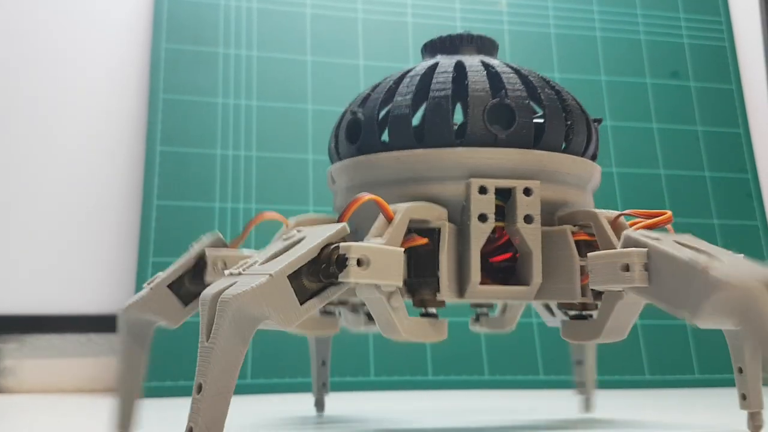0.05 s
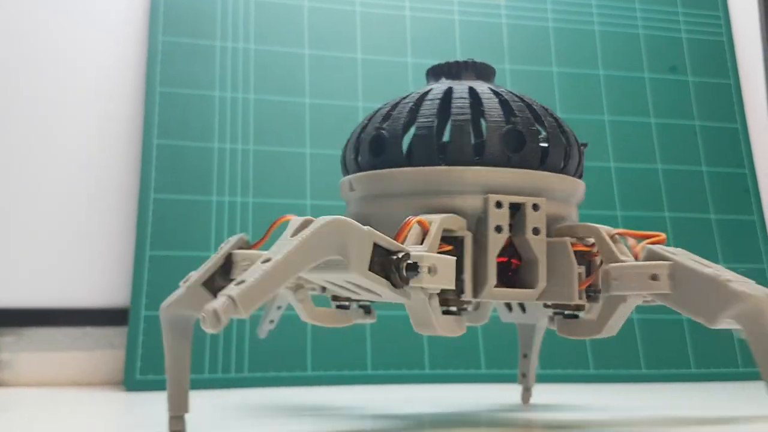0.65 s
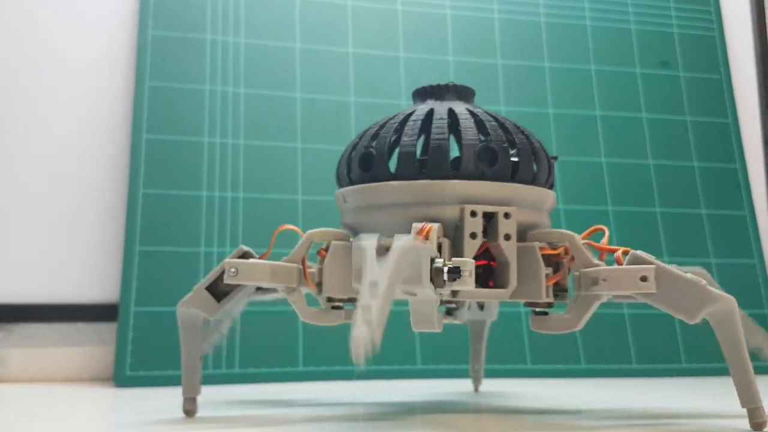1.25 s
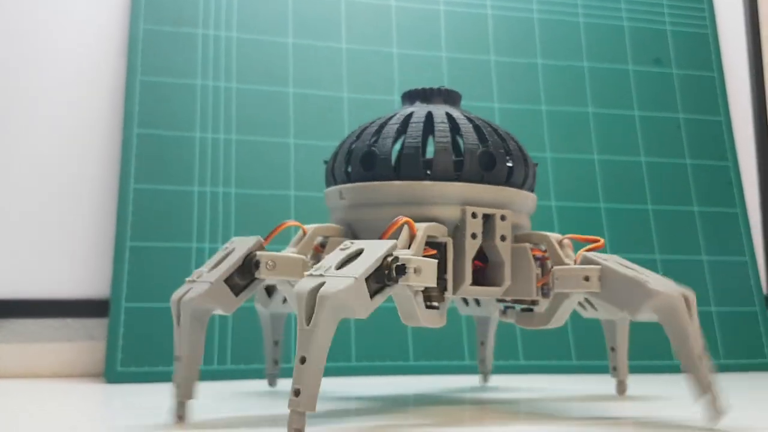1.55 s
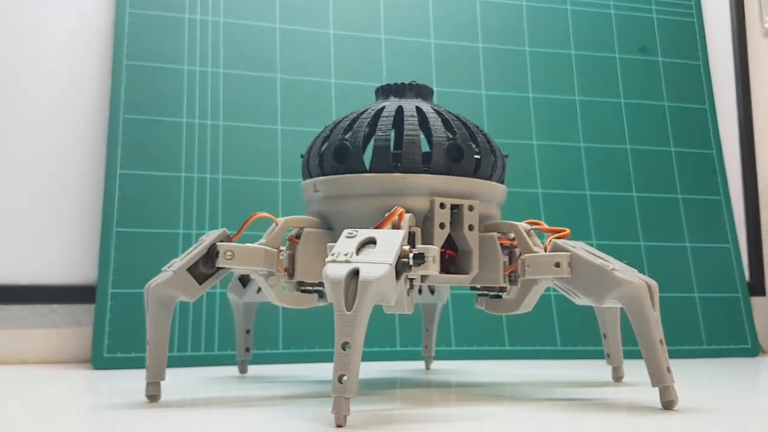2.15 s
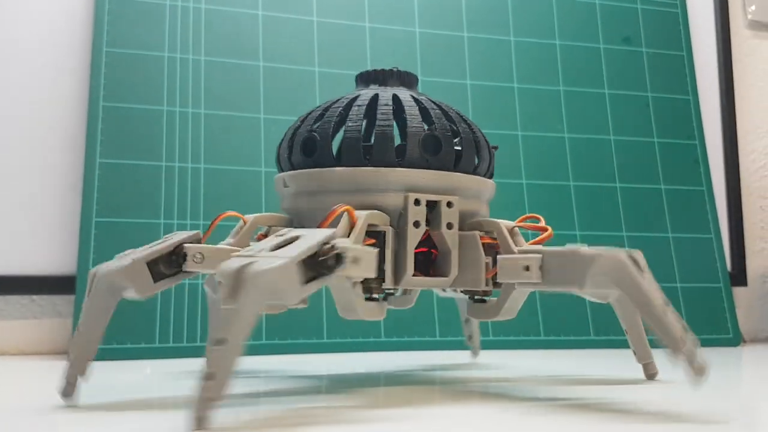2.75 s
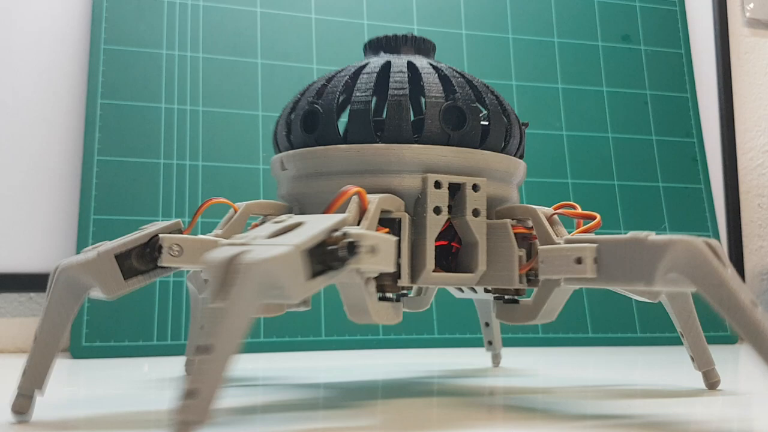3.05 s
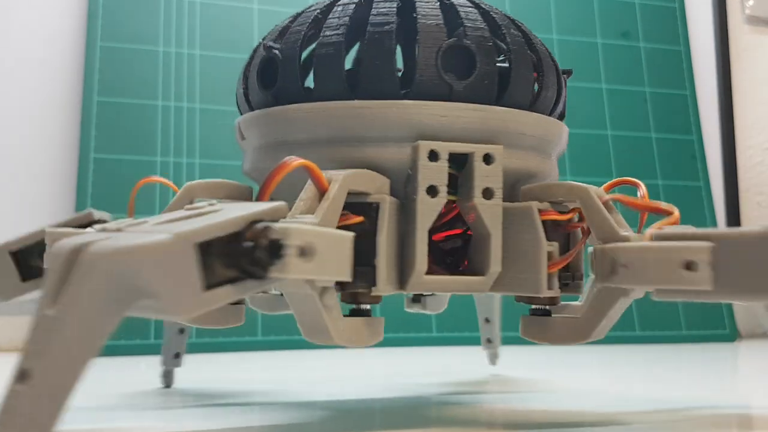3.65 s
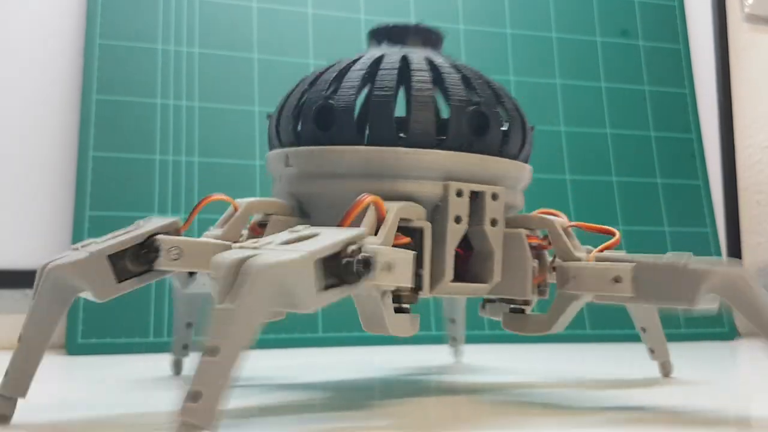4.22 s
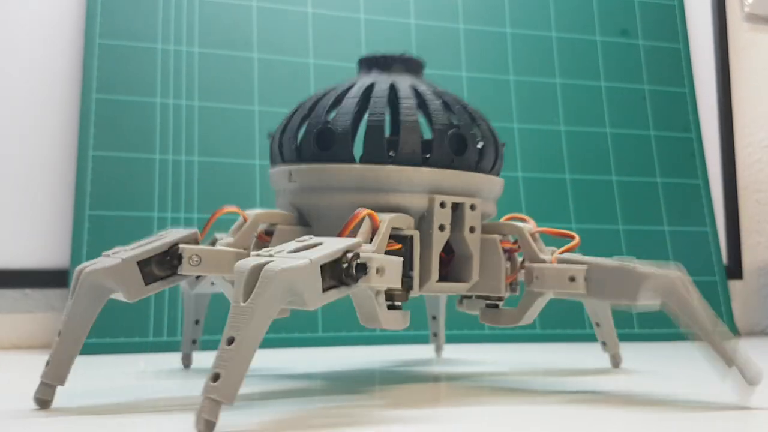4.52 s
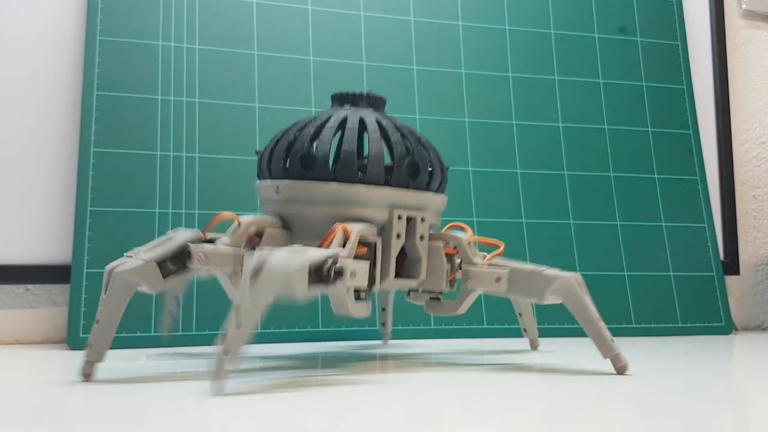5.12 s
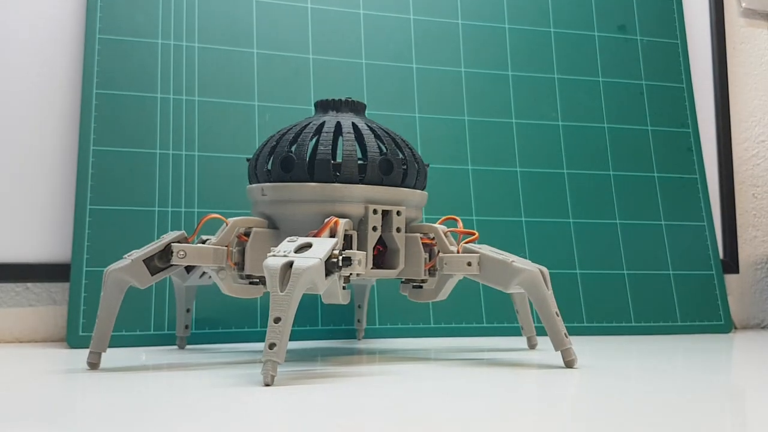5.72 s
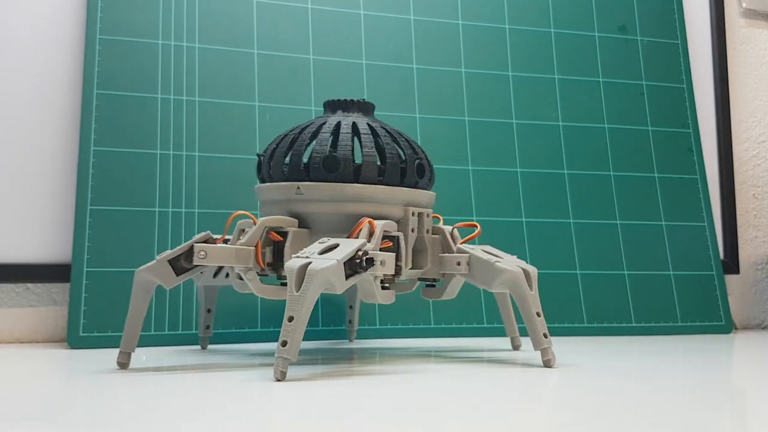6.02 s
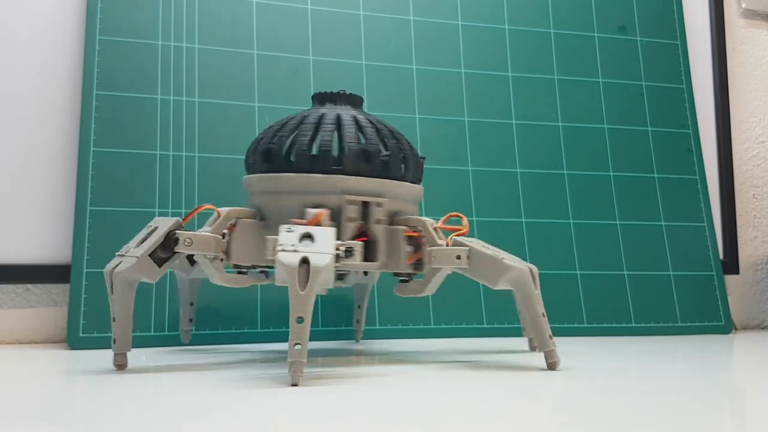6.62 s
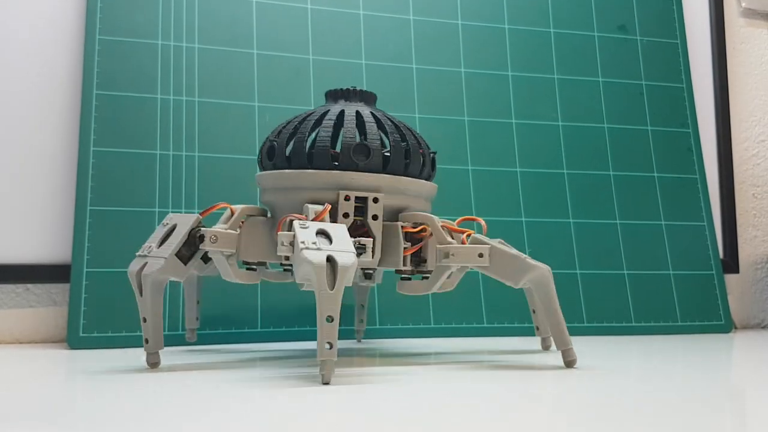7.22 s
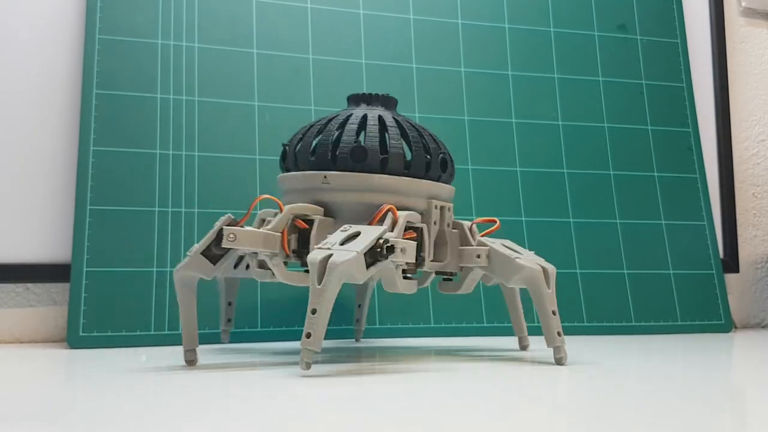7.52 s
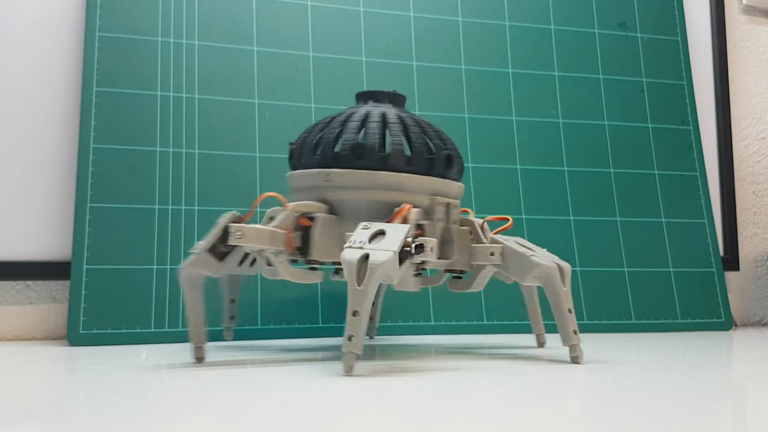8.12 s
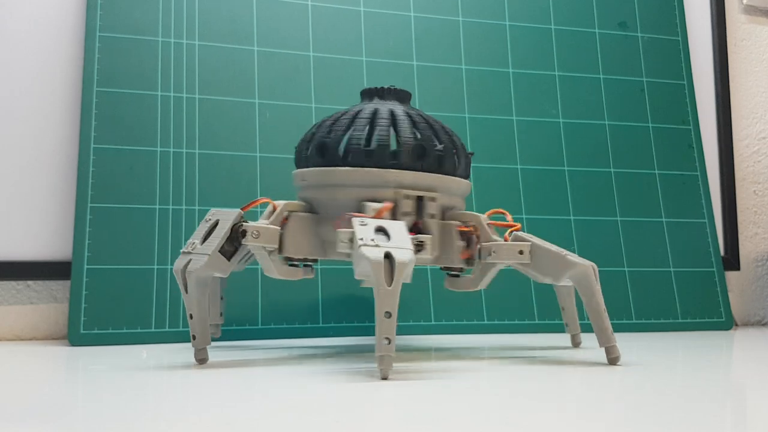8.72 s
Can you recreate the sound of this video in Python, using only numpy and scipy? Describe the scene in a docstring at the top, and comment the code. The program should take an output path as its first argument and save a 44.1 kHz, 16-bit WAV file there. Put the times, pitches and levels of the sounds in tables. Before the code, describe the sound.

Close up in a small room, bursts of geared servo whirr alternate with the clack of a little robot's plastic feet on a tabletop. The steps are measured at first, stop briefly, then return about twice as fast with short skids. Following another short rest the tapping ends, and the motors whine up and down in an even rhythm while the feet scrape and squeak. A faint electric buzz fills the gaps.

```python
"""Small four-legged robot on a table.

It walks, trots, then twists on the spot, heard close by in a small room. Hobby servos whirr in bursts
(gear clicks, friction, pinion whine, brush hiss) over a faint holding buzz; a loaded leg hums briefly.
Printed plastic feet knock, chatter and ring the table top, and stick-slip into squeaks when dragged."""
import sys
import numpy as np
from scipy import signal
from scipy.fft import rfft, irfft, next_fast_len
from scipy.io import wavfile
from scipy.ndimage import uniform_filter1d

SR = 44100
rng = np.random.default_rng(int(sys.argv[2]) if len(sys.argv) > 2 else 0)


def digitize_waveform(pressure):
    """Quantize a signal to 16-bit integers and store it at the path in sys.argv[1].

    Rows of a 2-D input are taken as channels; values are limited to [-1, 1].
    """
    field = np.atleast_2d(pressure).T
    bounded = np.clip(field, -1, 1)
    quanta = np.round(bounded * 32767).astype(np.int16)
    wavfile.write(sys.argv[1], SR, quanta)


N = 390726
TIME_S = np.arange(N) / SR

# walk, trot, twist: start_s, end_s, carry_effort_db, hiss_db, growl_db, scrape_db
GAITS = [(-0.1, 1.937, -37, -0.8, -0.5, -20.5), (2.411, 5.405, -34, -2, -0.6, -18),
         (5.921, 8.86, -42.5, -3.5, -2, -15)]
# single leg swings: start_s, effort_db, hold_s, fall_db_per_s
LEG_SWINGS = [(-0.1, -18.5, 0.056, 136), (0.253, -20.5, .11, 80), (0.641, -19, 0.087, 134),
              (1.018, -20, 0.06, 79), (1.389, -19.5, 0.077, 126), (1.758, -20, 0.023, 105),
              (2.408, -24, 0.057, 163), (2.578, -21.5, 0.078, 118), (5.365, -28, 0.014, 228),
              (5.923, -22, .15, 214)]
# diagonal leg pairs pushing in turn: start_s, effort_db, hold_s
TROT_PUSHES = [(2.729, -25.5, 0.12), (2.88, -22.5, 0.067), (3.031, -27, 0.12), (3.213, -22, 0.029),
               (3.338, -26.5, 0.13), (3.482, -23, 0.05), (3.64, -24, 0.11), (3.83, -22.5, 0.07),
               (3.978, -24.5, 0.047), (4.105, -23.1, 0.13), (4.275, -25.9, 0.1), (4.438, -22, 0.07),
               (4.601, -25.5, 0.12), (4.749, -23.0, 0.094), (4.915, -25.5, 0.11), (5.055, -23, 0.091),
               (5.216, -20, 0.031)]
# body twists, all legs together: start_s, effort_db, hold_s
TWISTS = [(6.279, -22, 0.25), (6.629, -21.5, 0.22), (7.004, -21.5, 0.25), (7.357, -21, 0.2),
          (7.714, -21, 0.25), (8.072, -21, 0.21), (8.423, -20.5, 0.24), (8.773, -21.5, 0.2)]
# feet landing in pairs: start_s, first_foot_db, lag_s, second_foot_db, thud_db
LANDINGS = [(0.107, -11, 0.054, -9, 10.5), (0.476, -8.5, 0.015, -8.5, 3.5),
            (0.871, -12.5, 0.053, -10.5, 6.5), (1.218, -11, 0.017, -7.5, -4),
            (1.502, -35.5, 0.054, -36, 21), (1.617, -11, .053, -10.5, 7.5), (1.888, -11.5, .017, -7, -3),
            (2.306, -41, .02, -57, 26), (2.727, -6.5, .029, -7, 1), (2.867, -8.5, .019, -7, -5),
            (2.938, -16, 0.0084, -30, -17), (3.024, -7.5, .017, -9, -13), (3.155, -15, .039, -10, -12),
            (3.341, -11, 0.018, -7, -5), (3.474, -12.5, 0.031, -8, -5.5), (3.661, -10, 0.016, -10, 6),
            (3.79, -12, 0.015, -13, -9), (3.973, -9.5, 0.021, -7.5, 2), (4.125, -8, .012, -14.5, -3),
            (4.286, -6.5, .027, -7, 1), (4.427, -13, 0.0086, -5, 1), (4.597, -6, 0.019, -6.5, -1),
            (4.747, -7.5, 0.013, -22, -1), (4.917, -4.5, 0.02, -6.5, -3), (5.057, -5, 0.012, -12.5, -1.5),
            (5.215, -9.5, .029, -5, -2.5), (5.346, -16.5, 0.015, -9.5, -3), (5.424, -24, .01, -47, -11),
            (8.325, -46, 0.034, -46, 33)]
# table and leg resonances: pitch_hz, level_db, t60_s
TABLE_MODES = [(135.5, -18.5, 0.18), (317.7, -17, 0.11), (566, -15.5, 0.076), (856, -14.5, 0.13),
               (1153, -10.5, 0.081), (1250, -4, 0.057), (1326, -6.5, 0.064), (2013, -0.5, 0.033),
               (2205, -2.5, 0.02), (2400, -23, 0.12), (2620, -10.5, 0.04)]
# skidding feet: start_s, end_s, first_hz, last_hz, level_db, octave_relative_db
SKIDS = [(.49, 0.531, 1308, 1238, -24, -14), (1.236, 1.29, 1410, 1170, -25, -11),
         (1.909, 1.956, 1302, 1240, -23.5, -3), (2.658, 2.863, 1244, 1460, -27.5, -23),
         (2.947, 2.973, 1734, 1670, -23.5, -25), (2.976, 3.014, 1395, 1334, -19.5, 9.5),
         (3.026, 3.095, 1355, 1378, -23.5, -20), (5.999, 6.077, 1267, 1242, -26.5, -19.5),
         (6.796, 6.88, 1085, 1130, -24, 3.5), (6.885, 6.935, 1200, 1215, -16.5, -6)]
# two-note drags, two feet squeaking in turn, every other twist: start_s, high_note_db, low_note_db
DRAGS = [(6.304, -20, -22), (7.031, -30.5, -22), (7.747, -26, -21), (8.463, -22, -21)]
# source spectra: frequency_hz, gain_db
ROOM_SPECTRUM = [(25, -29), (40, -25), (62, -3), (85, -5), (115, -2), (150, -2.5), (190, -14.5),
                 (320, -13.5), (500, -18), (1000, -10)]
GEAR_SPECTRUM = [(300, -27), (600, -64), (900, -5), (1150, -19), (1450, 0.5), (1900, -3), (2700, 5),
                 (3400, 2), (3900, -1), (5200, 1.5), (5800, 1), (6600, 5.5), (8000, -1.5), (9500, -23)]
BRUSH_SPECTRUM = [(7000, -23), (8500, -3), (9500, -0.5), (10900, 0.5), (12500, -5), (14000, -10.5),
                  (15800, -16.5)]
SCRAPE_SPECTRUM = [(60, -18), (150, -18.5), (330, -0.5), (450, -1.5), (750, -4.5), (950, 1.5), (1300, 13.5),
                   (2200, -28), (5000, -39)]
KNOCK_SPECTRUM = [(60, -22.5), (130, -12), (250, 0), (600, 6), (1200, 8.5), (1900, 10), (2500, 7.5),
                  (3100, -0.5), (3800, -8.5), (6000, -42), (15000, -16)]
# left-right likeness: frequency_hz, correlation
MIC_CORRELATION = [(100, 0.86), (600, 0.6), (1300, 0.21), (3000, 0.49), (6000, -0.5), (15000, 0)]
# microphone port colour: frequency_hz, left_minus_right_db
MIC_BALANCE = [(60, 0), (130, 1.5), (250, 0.5), (500, 3.5), (1100, 1.5), (2300, -2), (3300, -1.5),
               (5000, 1.5), (6300, 5.5), (8500, -5.5), (14000, -6.5)]

SPIN_UP_S, SETTLE_DB_PER_S = 0.02, 170


def from_db(db):
    """Decibels to gain."""
    return 10 ** (np.asarray(db) / 20)


def unit_rms(x):
    """Scale the channel mean to rms 1."""
    return x / np.sqrt(np.mean(np.atleast_2d(x).mean(axis=0) ** 2) + 1e-20)


def at_hz(points, hz):
    """Interpolate on a log-frequency axis."""
    knots_hz, values = np.transpose(points)
    return np.interp(np.log(hz + 1), np.log(knots_hz), values)


def drift(rate_hz):
    """Random wander, rms 1."""
    knots = rng.standard_normal(int(TIME_S[-1] * rate_hz) + 2)
    return unit_rms(np.interp(TIME_S * rate_hz, np.arange(len(knots)), knots))


def convolve(x, response):
    """Apply a mono or stereo impulse response."""
    return signal.oaconvolve(np.atleast_2d(x), np.atleast_2d(response), axes=1)[:, :N]


def butterworth(x, order, cutoff_hz, kind="low"):
    """Low-pass or high-pass filter."""
    return signal.sosfilt(signal.butter(order, cutoff_hz, kind, fs=SR, output="sos"), x)


def colour(x, spectrum, size=4096):
    """Minimum-phase filter with the given spectrum."""
    gain = from_db(at_hz(spectrum, np.fft.rfftfreq(size, 1 / SR)))
    cepstrum = irfft(np.log(gain))
    cepstrum[1:size // 2] *= 2
    cepstrum[size // 2 + 1:] = 0
    return convolve(x, irfft(np.exp(rfft(cepstrum))))


def stereo_noise(size):
    """White noise, left and right most alike in the bass."""
    padded = next_fast_len(size, real=True)
    alike = np.clip(at_hz(MIC_CORRELATION, np.fft.rfftfreq(padded, 1 / SR)), -1, 1)
    mid, side = rfft(rng.standard_normal((2, padded)))
    spectra = np.sqrt((1 + alike) / 2) * mid + np.sqrt((1 - alike) / 2) * side * [[1], [-1]]
    return irfft(spectra, padded)[:, :size]


def reflections(x, near_db, near_t60_s, room_db, room_t60_s=0.26, size=16384):
    """Direct sound, quick echoes off frame, table and wall, and the room tail."""
    t = np.arange(size) / SR
    response = np.zeros((2, size))
    response[:, 0] = 1
    for level_db, t60_s in (near_db, near_t60_s), (room_db, room_t60_s):
        fade = from_db(-60 * t / t60_s) * (t > .0008)
        response += from_db(level_db) * stereo_noise(size) * fade / np.linalg.norm(fade)
    return convolve(x, response)


def ring(clicks, hz, t60_s):
    """One mode: each click starts a decaying sine."""
    radius, angle = from_db(-60 / (t60_s * SR)), 2 * np.pi * hz / SR
    return signal.lfilter([0, np.sin(angle)], [1, -2 * radius * np.cos(angle), radius ** 2],
                          clicks + 1e-18)


def pulses(rate_hz, uneven_db):
    """One click of random strength per cycle, split between two samples."""
    cycles = np.cumsum(rate_hz) / SR
    at = np.flatnonzero(np.diff(np.floor(cycles)))
    early_share = cycles[at + 1] % 1 * SR / rate_hz[at + 1]
    strength = from_db(uneven_db * np.clip(rng.standard_normal(N)[at], -2, 2))
    clicks = np.zeros(N)
    clicks[at] += strength * early_share
    clicks[at + 1] += strength * (1 - early_share)
    return unit_rms(clicks - uniform_filter1d(clicks, size=441))


def burst(start_s, hold_s, fall_db_per_s, attack_s=SPIN_UP_S):
    """Gain of one motor move: spin up, hold, slow down."""
    t = TIME_S - start_s
    return np.clip(t / attack_s, 0, 1) * from_db(-fall_db_per_s * np.clip(t - hold_s, 0, 1))


def room_tone(level_db=-52):
    """Low, steady room rumble."""
    rumble = butterworth(colour(stereo_noise(N), ROOM_SPECTRUM), order=2, cutoff_hz=1000)
    return from_db(level_db) * unit_rms(rumble)


def holding_buzz(frame_hz=58.4, level_db=-52.5):
    """Loaded servos, nudged once per control frame, tick through their cases throughout."""
    ticks = pulses(frame_hz * (1 + 0.0072 * drift(20)), uneven_db=2.5)
    ticks = reflections(ticks, near_db=10, near_t60_s=.04, room_db=8)
    return from_db(level_db) * unit_rms(colour(ticks, GEAR_SPECTRUM))


def servo_effort_db(idle_db=-51.5, jolt_db=-24):
    """Joint effort: carrying the body, swinging, catching landings, trotting, twisting."""
    gates = [burst(start_s, end_s - start_s, SETTLE_DB_PER_S) for start_s, end_s, *_ in GAITS]
    carrying = sum(from_db(db) * gate for gate, (_, _, db, *_) in zip(gates, GAITS))
    swings = [from_db(db) * burst(start_s, hold_s, fall) for start_s, db, hold_s, fall in LEG_SWINGS]
    jolts = [from_db(db + jolt_db) * burst(start_s + lag_s - SPIN_UP_S, hold_s=0.063, fall_db_per_s=160)
             for start_s, _, lag_s, db, _ in LANDINGS]
    moves = [*swings, *jolts, *trot_pushes(), *twist_pushes()]
    move_power = sum(gates) ** 2 * sum(move ** 2 for move in moves)  # moves die with their gait
    return 10 * np.log10(from_db(idle_db) ** 2 + carrying ** 2 + move_power)


def gait_colour_db():
    """Hiss, growl and scrape curves, constant within a gait."""
    rows = [(s, *tone_db) for start_s, end_s, _, *tone_db in GAITS for s in (start_s, end_s)]
    knots_s, *columns = np.transpose(rows)
    return [np.interp(TIME_S, knots_s, column) for column in columns]


def gear_train(tooth_hz, sweep, surge_db=3):
    """One servo clicks tooth by tooth under changing load; its pace steadies in a shared sweep."""
    wander = (.02 + .1 * (1 - sweep)) * drift(12)
    jitter = .006 * drift(300)
    teeth = pulses(tooth_hz * (1 + wander + jitter), uneven_db=3)
    surge = from_db(surge_db * drift(18))
    return surge * unit_rms(reflections(teeth, near_db=6, near_t60_s=0.039, room_db=1))


def pinion_whine(speed, top_mesh_hz=2950, flicker_db=5, pinions=2):
    """Meshing motor pinions: pitch follows speed, harmonics come and go."""
    whine = np.zeros((2, N))
    for _ in range(pinions):
        mesh_hz = top_mesh_hz * speed * (1 + .04 * drift(12) + .016 * drift(500))
        phase = 2 * np.pi * np.cumsum(mesh_hz) / SR
        for harmonic in (1, 2, 3):
            tone = from_db(flicker_db * drift(22)) * np.sin(harmonic * phase) / np.sqrt(harmonic)
            whine += [tone, np.roll(tone, rng.integers(2, 14))]
    return unit_rms(whine)


def table_echo(x, delay_s=0.000604, log_spread=0.367, gain=0.43):
    """The table mirrors a moving servo; the changing path shifts its colour."""
    echoes = [np.interp(TIME_S - delay_s * np.exp(log_spread * drift(9)), TIME_S, side) for side in x]
    return x + gain * np.array(echoes)


def servos(base_speed=.58, throb_hz=37, whine_db=-6.5, gear_db=-5, brush_db=-6, feet_db=-3):
    """Gear clicks and friction ring the servo cases; brushes hiss above, feet scrape below."""
    effort_db = servo_effort_db()
    hiss_db, growl_db, scrape_db = gait_colour_db()
    sweep = twist_sweep()
    speed = base_speed + (1 - base_speed) * sweep
    teeth = sum(gear_train(top_hz * speed, sweep) for top_hz in np.geomspace(340, 1480, num=4))
    friction = unit_rms(stereo_noise(N) * from_db(2 * drift(900)))
    whine = from_db(whine_db) * sweep ** 2 * pinion_whine(speed)
    throb = 1 + 0.079 * np.sin(2 * np.pi * throb_hz * TIME_S)  # slight, fast throb in the whirr
    rattle = table_echo(unit_rms(teeth) + friction + whine) * throb

    gears = unit_rms(colour(rattle * from_db(.7 * drift(70)), GEAR_SPECTRUM))
    growl = butterworth(gears, order=2, cutoff_hz=3300)
    growl_gain = from_db(growl_db + 0.054 * (effort_db - effort_db.mean()))  # hard work growls
    gears = from_db(gear_db) * (gears + (growl_gain - 1) * growl)
    brushes = from_db(hiss_db + brush_db + 1.1 * drift(55)) * unit_rms(colour(rattle, BRUSH_SPECTRUM))
    grit = stereo_noise(N) * from_db(1.76 * drift(70))
    scrape = from_db(scrape_db + feet_db) * unit_rms(colour(grit, SCRAPE_SPECTRUM))
    return from_db(effort_db) * (gears + brushes + scrape)


def touches(max_wait_s=.025, rebound_s=.014, rebound_db=-2.5):
    """Foot contacts as start_s, level_db, thud_db; a foot left waiting for its partner rebounds once."""
    for start_s, first_db, lag_s, second_db, thud_db in LANDINGS:
        yield start_s, first_db, thud_db
        if lag_s > max_wait_s:
            yield start_s + rebound_s, first_db + rebound_db, thud_db
        yield start_s + lag_s, second_db, thud_db


def foot(taps, chatter_s=.0028, bounce_db=-5, loss_db=2, knock_db=14, modes_db=-12, hits=7):
    """Each tap: a hard knock, then dying bounces of the slack joint; the table rings on."""
    start_s, level_db, thud_db = np.transpose(taps)
    gaps_s = chatter_s * rng.uniform(0.292, 1.7, (len(taps), hits))
    gaps_s[:, 0] = .001
    at = ((start_s[:, None] + np.cumsum(gaps_s, axis=1)) * SR).astype(int)
    sizes = from_db(bounce_db - loss_db * np.arange(hits) + rng.normal(0, 1.3, at.shape))
    sizes *= rng.choice([-1, 1], at.shape)
    sizes[:, 0] = 1
    knocks = np.bincount(at.ravel(), (sizes * from_db(level_db)[:, None]).ravel(), N)
    sound = from_db(knock_db) * colour(knocks, KNOCK_SPECTRUM)
    for hz, mode_db, t60_s in TABLE_MODES:
        weight_db = thud_db / (1 + (hz / 700) ** 2)  # heavy landings feed the low modes
        blows = from_db(level_db + modes_db + mode_db + weight_db + rng.normal(0, 2.4, len(taps)))
        blows *= rng.choice([-1, 1], len(taps))
        sound += ring(np.bincount(at[:, 0], blows, N), hz, t60_s)
    return reflections(sound, near_db=1.5, near_t60_s=0.029, room_db=-2)


def feet():
    """Four feet take turns, each with its own lag between microphones; no deep bass radiates."""
    taps = list(touches())
    steps = np.zeros((2, N))
    for k, lag_samples in enumerate([-6, 2, -2, 5]):
        left, right = foot(taps[k::4])
        steps += [left, np.roll(right, lag_samples)]
    return butterworth(steps, order=4, cutoff_hz=95, kind="high")


def squeaks(gain_db=0.3, edge_s=.019, sag_share=0.0349):
    """A dragged foot sticks and slips at audio rate: a rough, wavering tone."""
    waver = 1 + .012 * drift(60) + .018 * drift(450)
    tones = np.zeros(N)
    for start_s, end_s, first_hz, last_hz, db, octave_db in [*SKIDS, *drag_notes()]:
        during = (TIME_S > start_s - edge_s / 2) & (TIME_S < end_s + edge_s)
        t = TIME_S[during]
        grip = np.clip(np.minimum(t - t[0], (t[-1] - t) / 2) / edge_s, 0, 1)  # fast grip, slow release
        sag = 1 - sag_share * np.sin(np.pi * (t - start_s) / (end_s - start_s))  # foot bears down
        pitch_hz = np.interp(t, [start_s, end_s], [first_hz, last_hz]) * sag * waver[during]
        phase = 2 * np.pi * np.cumsum(pitch_hz) / SR
        tones[during] += grip * from_db(db) * (np.sin(phase) + from_db(octave_db) * np.sin(2 * phase))
    flutter_db = 2.7 * np.clip(drift(190), -2.5, 1.2)
    tones *= np.sqrt(2) * from_db(gain_db + flutter_db)
    left, right = reflections(tones, near_db=-14, near_t60_s=.03, room_db=-10)
    return np.array([left, np.roll(right, 6)])


def strain_hum(start_s=1.96, end_s=2.53, hum_hz=115, level_db=-52):
    """Servos holding a pose shake the table at about twice their control rate."""
    gain = from_db(level_db + 1.5 * drift(20)) * burst(start_s, end_s - start_s, SETTLE_DB_PER_S)
    return gain * np.sqrt(2) * np.sin(2 * np.pi * hum_hz * TIME_S)


def trot_pushes():
    """Effort gains: each push of a leg pair swells and ebbs into the next."""
    for start_s, db, hold_s in TROT_PUSHES:
        yield from_db(db) * burst(start_s, hold_s, fall_db_per_s=76, attack_s=0.042)


def twist_pushes(out_db_per_s=-7.5, back_db_per_s=8, coast_at_s=0.14, coast_width_s=0.049, coast_db=-2.5):
    """Effort gains: each twist drives, coasts and brakes; out and back alternate."""
    for k, (start_s, db, hold_s) in enumerate(TWISTS):
        t = np.clip(TIME_S - start_s, 0, hold_s)
        slope_db = (back_db_per_s if k % 2 else out_db_per_s) * (t - hold_s / 2)
        dip_db = coast_db * np.exp(-((t - coast_at_s) / coast_width_s) ** 2)
        yield from_db(db + slope_db + dip_db) * burst(start_s, hold_s, fall_db_per_s=185)


def twist_sweep(length_s=.32):
    """Motors speed up and brake in each twist: 0 outside twists, 1 at top speed."""
    sweep = np.zeros(N)
    for start_s, *_ in TWISTS:
        during = (TIME_S > start_s) & (TIME_S < start_s + length_s)
        sweep[during] = np.abs(np.sin(np.pi * (TIME_S[during] - start_s) / length_s)) ** (2 / 3)
    return sweep


def drag_notes(high_hz=(1280, 1233), low_hz=(1005, 1050), drop_after_s=.064, low_s=.102, octave_db=-14):
    """Two dragged feet squeak in turn: one high, then the other on a lower note; rows as in SKIDS."""
    for start_s, high_db, low_db in DRAGS:
        drop_s = start_s + drop_after_s
        yield start_s, drop_s - .008, *high_hz, high_db, octave_db
        yield drop_s, drop_s + low_s, *low_hz, low_db, octave_db


def scene():
    """Robot, table and room."""
    return servos() + holding_buzz() + strain_hum() + feet() + squeaks() + room_tone()


def record(dry, lag_samples=2, cutoff_hz=15700):
    """Two microphone ports, each with its own colour, the right one late; clipped, then low-passed."""
    left = colour(dry[0], [(hz, db / 2) for hz, db in MIC_BALANCE])[0]
    right = colour(dry[1], [(hz, -db / 2) for hz, db in MIC_BALANCE])[0]
    right = np.pad(right, (lag_samples, 0))[:N]
    lowpass = signal.ellip(12, .1, 80, cutoff_hz, fs=SR, output="sos")
    return signal.sosfilt(lowpass, np.clip([left, right], -1, 1))


dry = scene()
out = record(dry)
digitize_waveform(out)
```